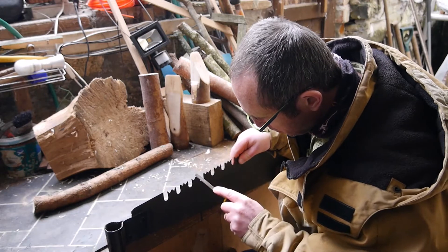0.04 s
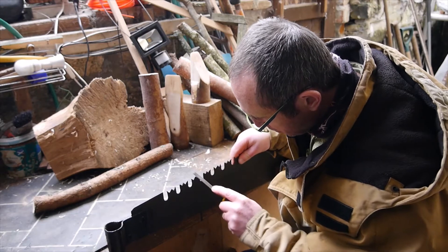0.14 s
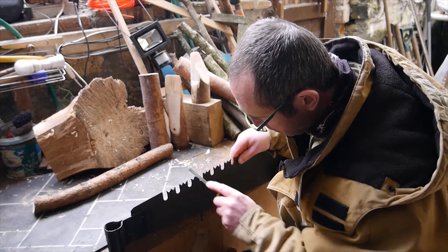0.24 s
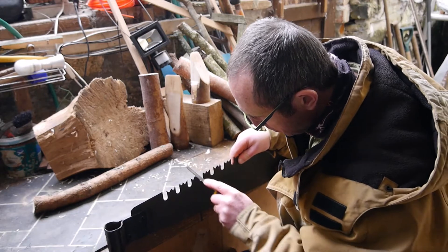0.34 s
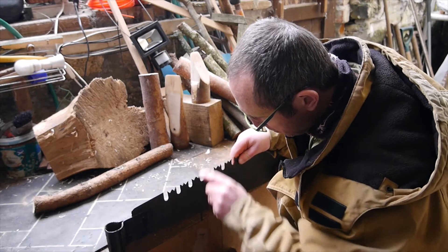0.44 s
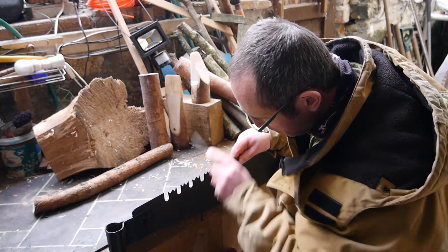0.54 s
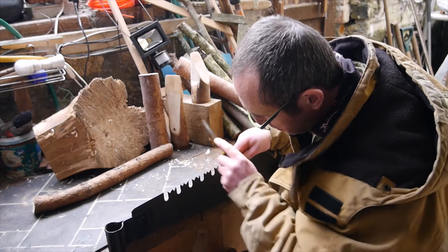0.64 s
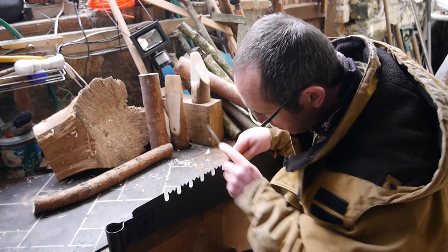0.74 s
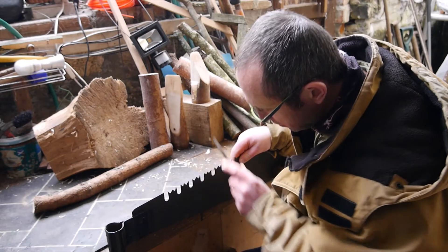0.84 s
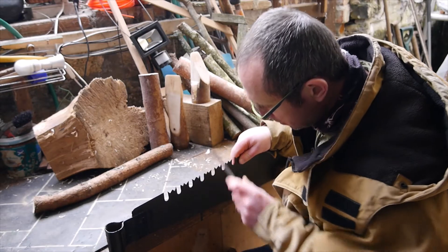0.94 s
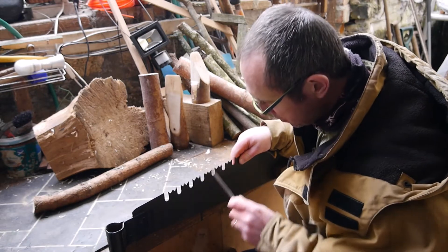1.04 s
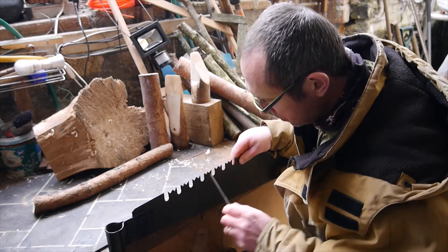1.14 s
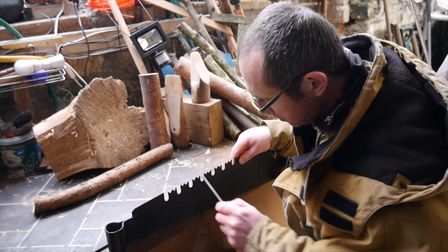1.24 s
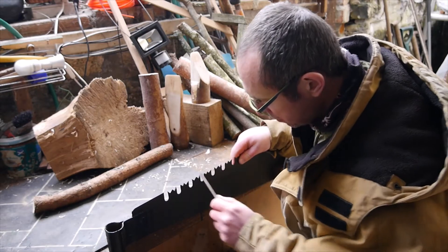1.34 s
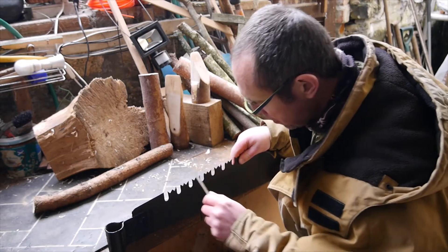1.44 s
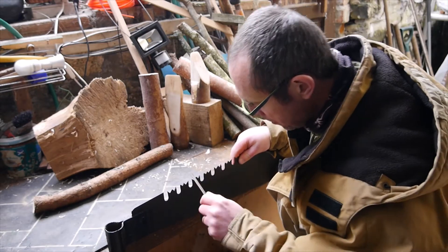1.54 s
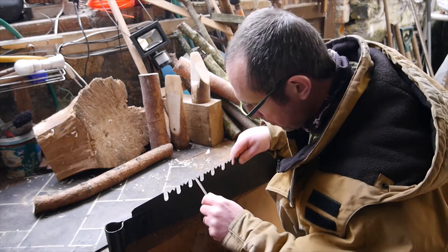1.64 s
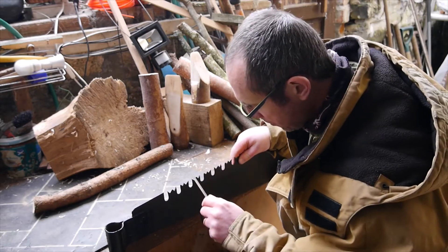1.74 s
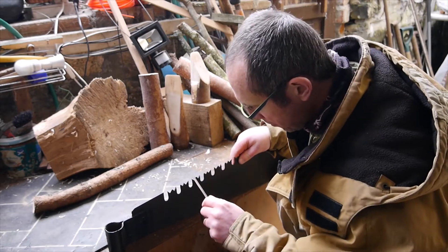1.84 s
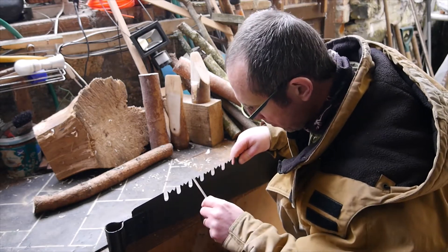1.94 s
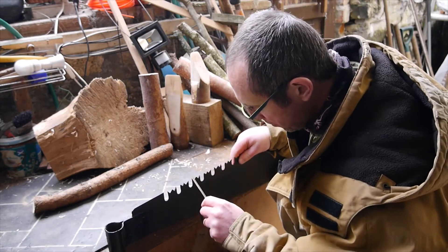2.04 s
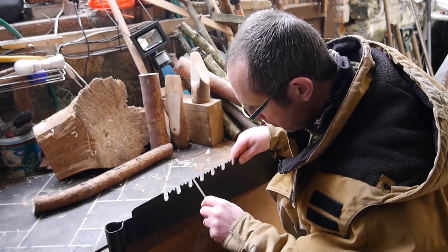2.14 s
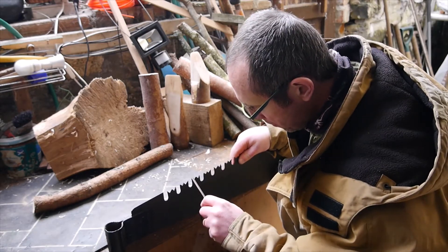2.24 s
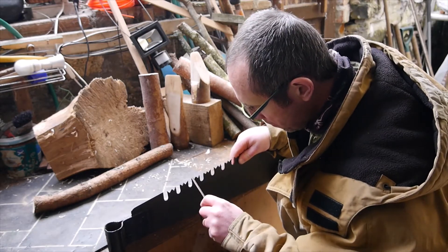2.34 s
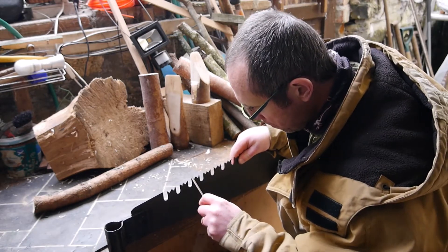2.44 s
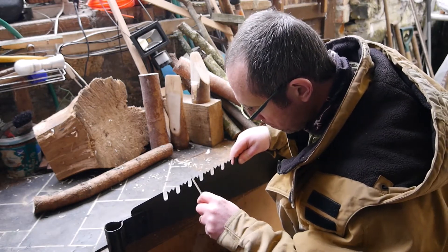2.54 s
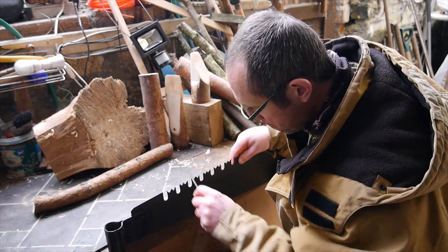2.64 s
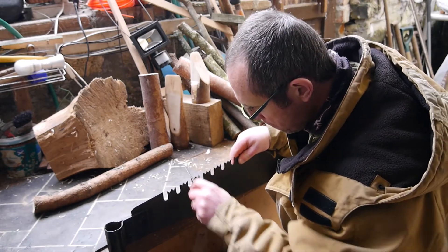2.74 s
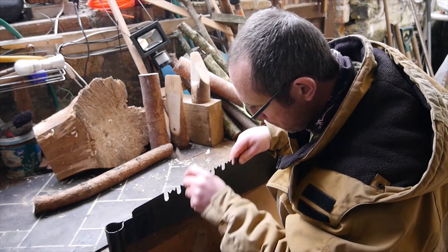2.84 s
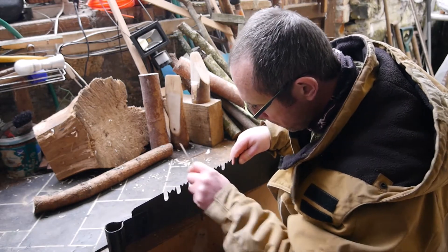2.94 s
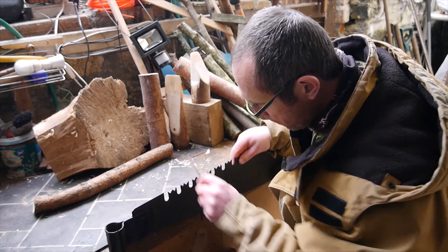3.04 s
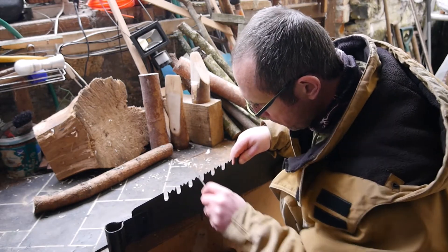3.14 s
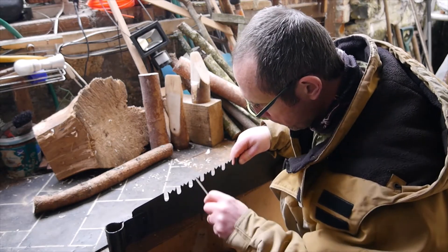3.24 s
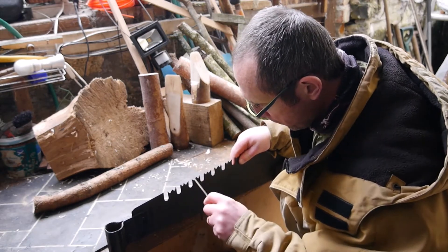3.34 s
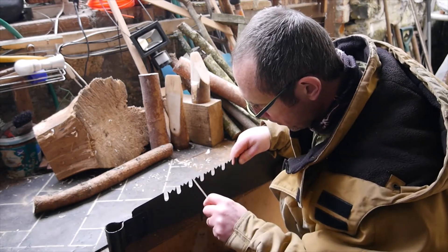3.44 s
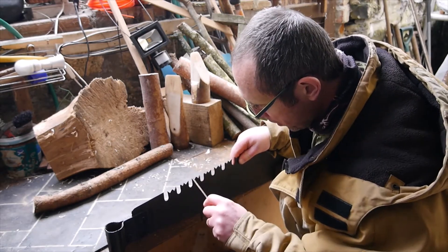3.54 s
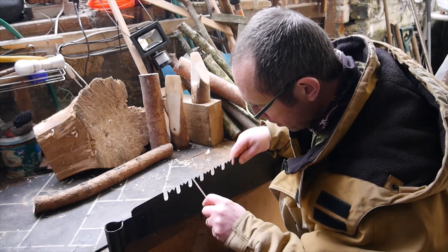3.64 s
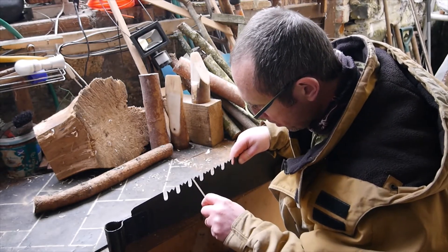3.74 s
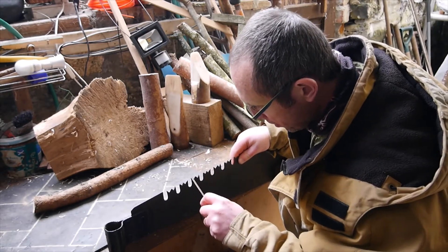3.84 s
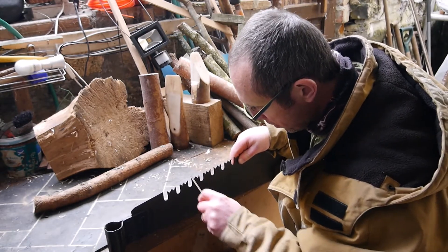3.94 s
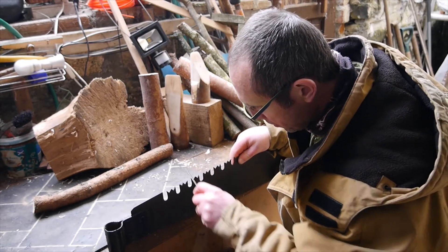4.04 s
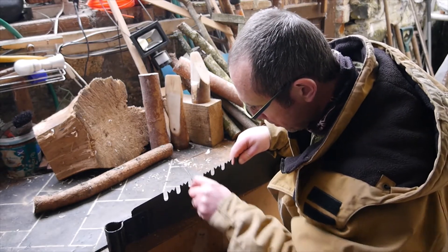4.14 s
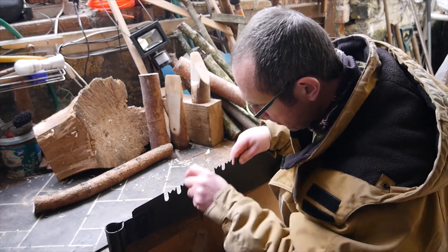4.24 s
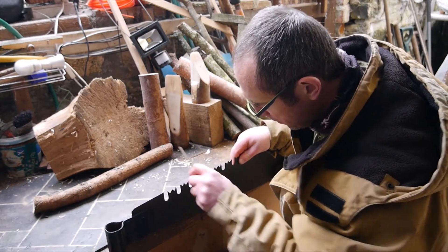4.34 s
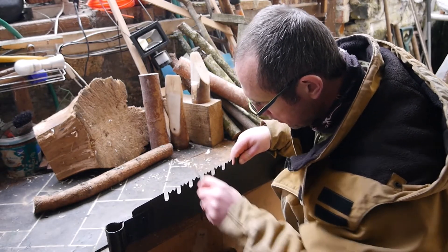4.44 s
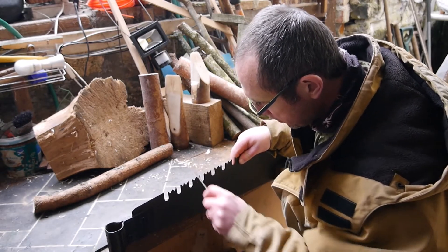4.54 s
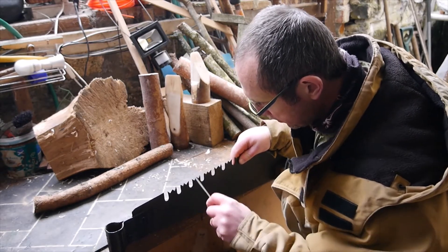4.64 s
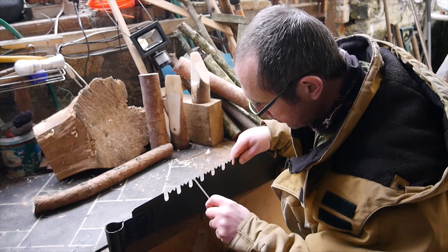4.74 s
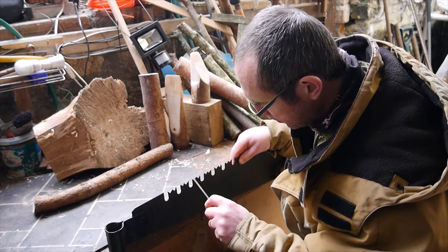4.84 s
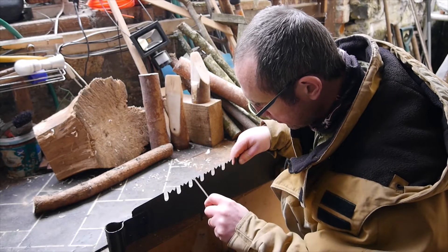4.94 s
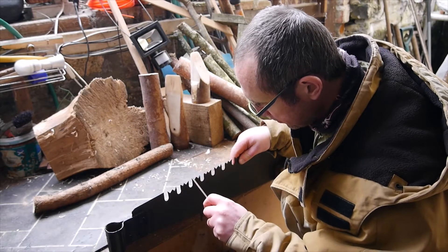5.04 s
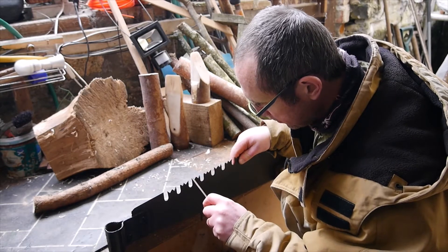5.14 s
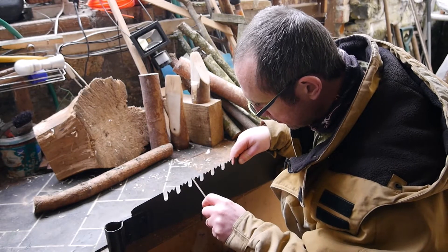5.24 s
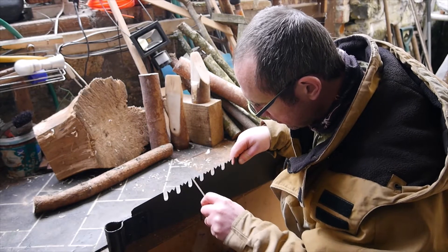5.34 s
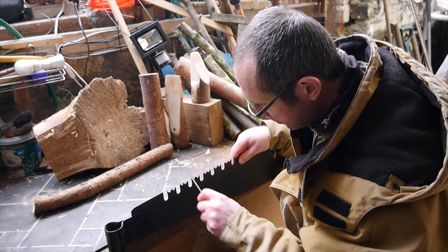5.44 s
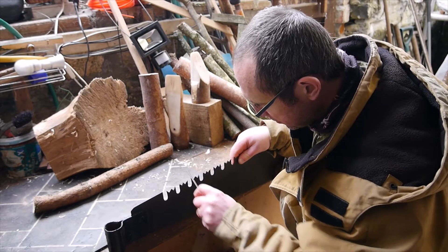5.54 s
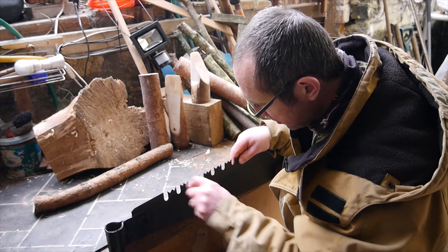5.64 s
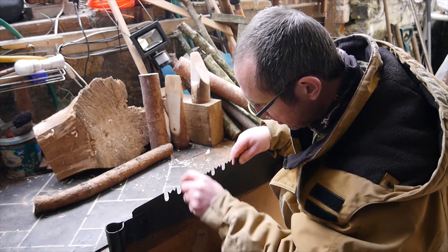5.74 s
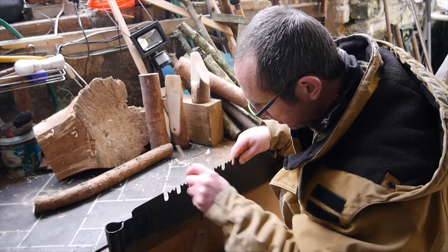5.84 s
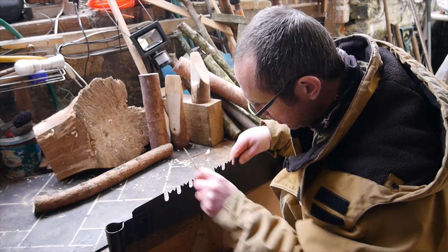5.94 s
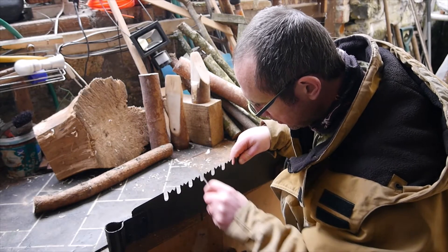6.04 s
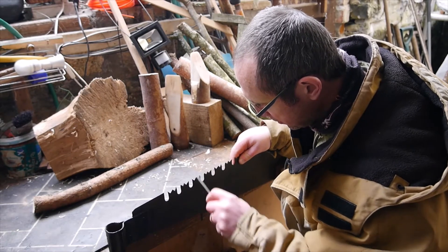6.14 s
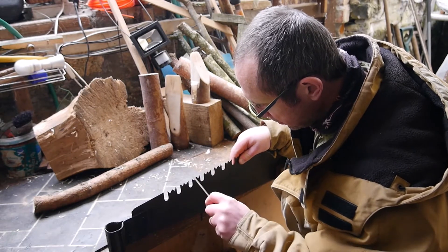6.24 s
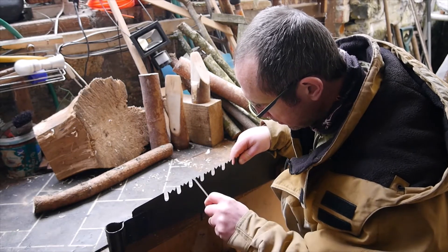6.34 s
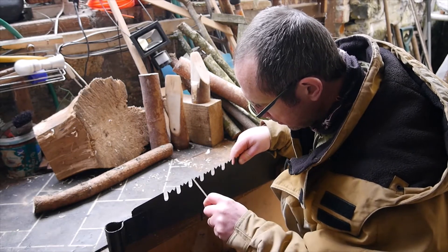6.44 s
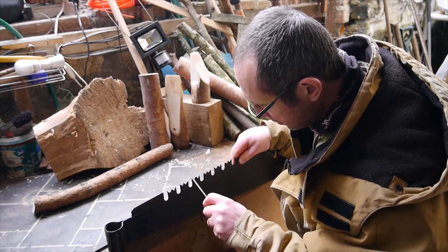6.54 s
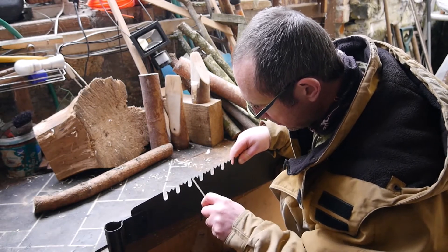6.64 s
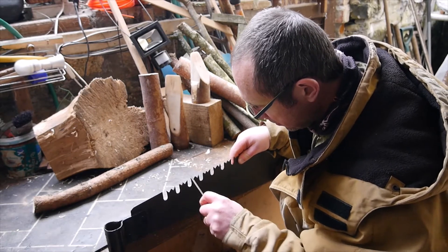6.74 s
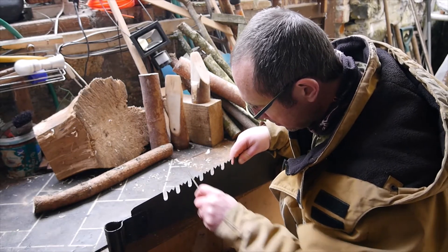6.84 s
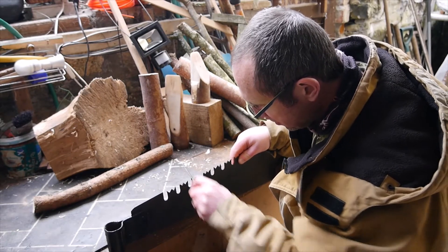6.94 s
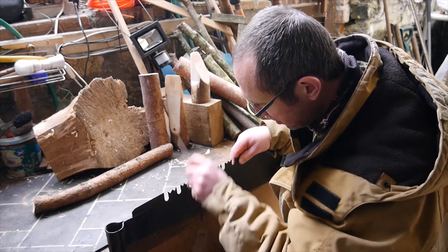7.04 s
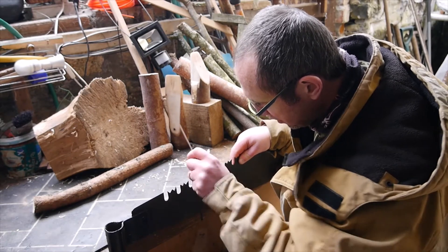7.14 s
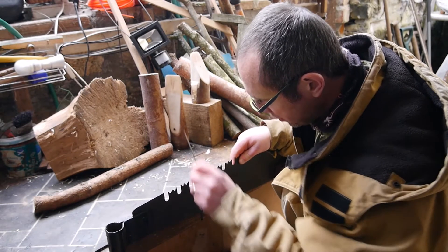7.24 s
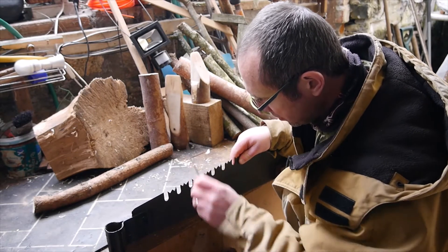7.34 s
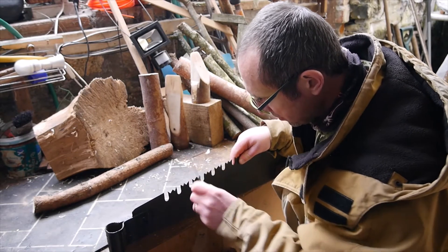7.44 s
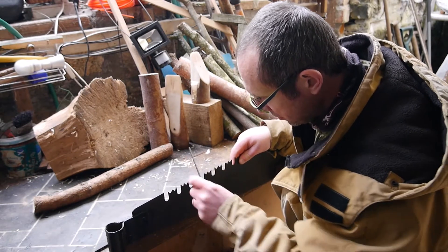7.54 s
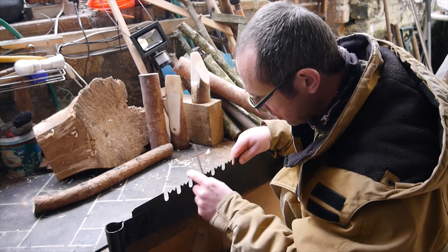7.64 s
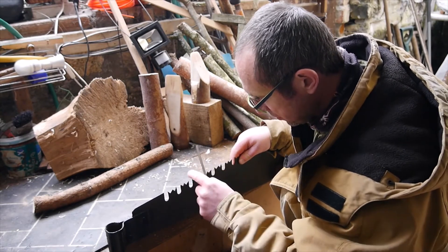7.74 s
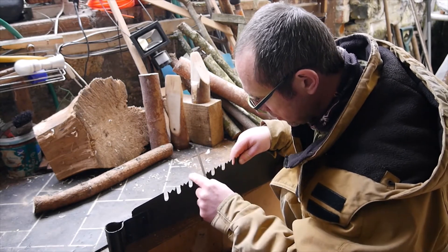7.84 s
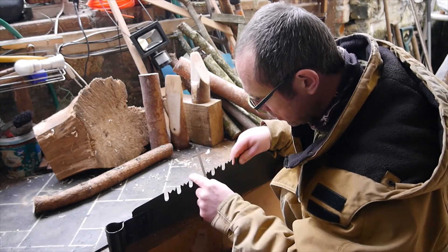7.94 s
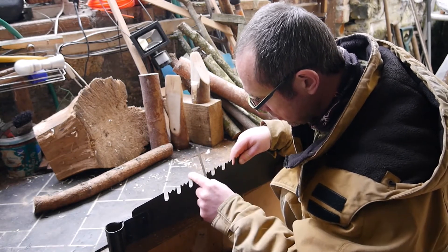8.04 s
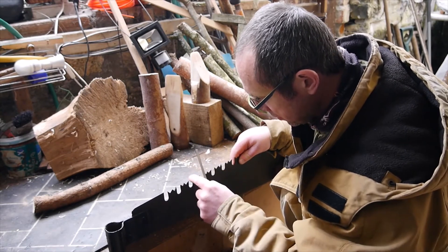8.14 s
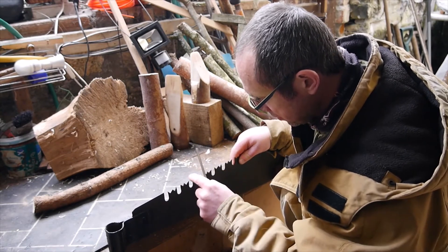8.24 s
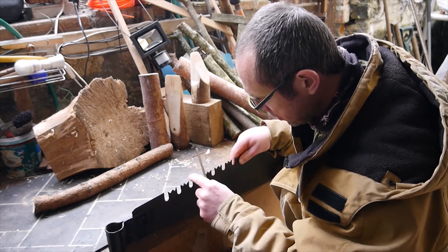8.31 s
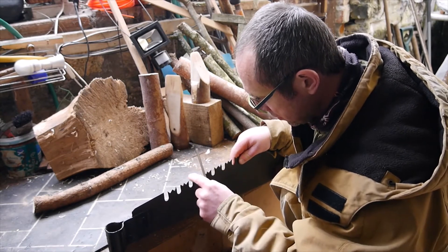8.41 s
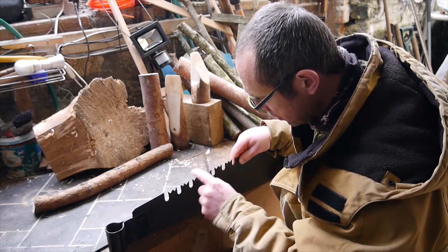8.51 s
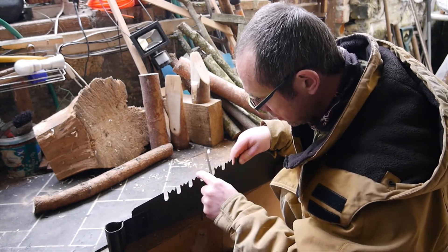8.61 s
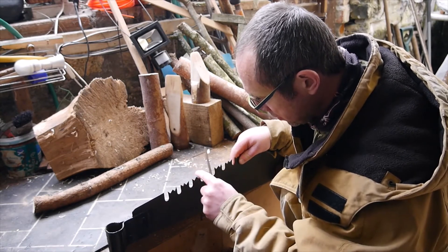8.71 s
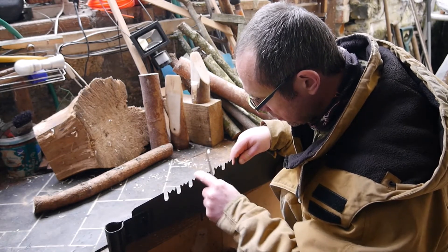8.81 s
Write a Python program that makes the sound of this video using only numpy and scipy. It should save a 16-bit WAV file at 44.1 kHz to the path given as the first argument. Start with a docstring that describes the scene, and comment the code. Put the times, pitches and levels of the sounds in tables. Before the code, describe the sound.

A small file works slowly across the teeth of a large saw blade, heard close in a workshop with short echoes and steady, quiet room noise. There are five strokes, at about 0.2 to 0.5 seconds, 2.5 to 2.8, 3.7 to 4.2, 5.4 to 5.8 and 6.7 to 7.0. Each catches on the teeth, judders the blade with a low thrum, brightens into a gritty rasp and ends in a scrape, the steel ringing briefly. The fourth has the sharpest ending. Between strokes the file taps lightly on the steel, near 1.1, 2.1, 2.3, 3.1, 3.5, 4.4, 5.1 and 6.1 seconds. A heavy sleeve brushes softly around 0.9 seconds. A small bird outside whistles faint, thin, high notes from 1.7 to 2.4 and from 6.0 to 6.7 seconds. After the last stroke only room noise remains, with one tiny tap near 8.1 seconds.

```python
"""A workshop: a small file makes five slow strokes across the teeth of a big saw blade clamped to a bench.
Each stroke grips, judders the blade, brightens as it gathers speed and ends in a scrape; between strokes
the file taps back into its gullet. Tooth clicks and taps drive the steel's modes in four bands:
thrum (slow bending), rasp (middle modes), zing and hiss (cutting edge).
A sleeve brushes past and a small bird sings faintly outside, over short echoes and steady room noise."""
import sys
import numpy as np
from scipy import signal
from scipy.fft import rfft, irfft, next_fast_len
from scipy.io import wavfile
from scipy.ndimage import uniform_filter1d

SR = 44100
rng = np.random.default_rng(int(sys.argv[2]) if len(sys.argv) > 2 else 0)


def to_wav(sig):
    """Store sig (one row per channel, or 1-D mono) as 16-bit WAV at the path in sys.argv[1].

    Samples outside -1..1 are clipped; the rate is SR.
    """
    pcm = np.clip(np.atleast_2d(sig), -1, 1) * 32767
    pcm = np.round(pcm).astype(np.int16)
    wavfile.write(sys.argv[1], SR, pcm.T)  # frames by channels


N = 391166
TIME = np.arange(N) / SR

# File pushes, long and short; levels in all tables are relative: start/s, hardest press/s, let-go/s,
# thrum/dB, rasp/dB, edge/dB, press growth/dB, speed growth/dB, last scrape/dB, deep over high bending/dB
PUSHES = [ (0.175, 0.33, 0.525, -20.5, -34, -31.5, 8.5, 9.5, 14, 4.5),
          (2.45, 2.456, 2.51, -31.5, -49, -45, -0.5, -1, 0, 7),
          (2.528, 2.756, 2.838, -15.5, -28, -22, 13.5, 19, 1.5, 1),
          (3.723, 3.752, 3.77, -30.5, -42.5, -41, 9, 4.5, -3.5, 5),
          (3.906, 3.957, 4.034, -22, -35.5, -33, 10, 4.5, -2, 0.5),
          (3.964, 4.077, 4.232, -15, -27, -24, 10.5, 6.5, 5, -4),
          (5.166, 5.33, 5.24, -43, -52.5, -57.5, 6, 4, 0, 4),
          (5.365, 5.695, 5.762, -15.5, -28, -25, 13.5, 16, 4.5, -1),
          (6.643, 6.705, 6.72, -44, -59, -53, 6, 8, 2, 2),
          (6.727, 6.772, 6.784, -23, -37, -39, 2.5, 5, -0.5, -3.5),
          (6.817, 6.907, 7.031, -13.5, -27, -21.5, 3, 8.5, 3, -5.5), ]
# Rise as the teeth grip, fall as the file lifts: thrum/(dB/s), rasp/(dB/s), edge/(dB/s)
GRIP_DB_PER_S = [750, 2200, 3500]
LIFT_DB_PER_S = [291, 405, 443]
# Teeth catch and drag: t/s, thrum/dB, rasp/dB, edge/dB, decay constant/s
BITES = [(0.073, -39, -48.5, -55, 0.041), (0.145, -31, -54, -49, 0.027), (0.302, -13, -29, -28, .018),
         (0.43, -20.5, -39, -27.5, 0.06), (2.526, -21, -32, -33, .018), (2.612, -16, -31, -37, .014),
         (2.668, -8, -30, -37, 0.013), (2.706, -25, -26, -22, 0.016), (3.719, -34, -50, -39, 0.026),
         (3.826, -29.5, -44.5, -48, 0.038), (4.063, -6.5, -26, -24, 0.02), (4.172, -3, -21, -28, 0.012),
         (5.366, -13.5, -40, -41, 0.0081), (5.45, -36, -40, -28, 0.032), (5.492, -5.5, -21.5, -35, 0.013),
         (5.57, -9.5, -39, -34, 0.0097), (5.619, -6.5, -20.5, -26, 0.017), (5.702, -7, -20, -10, 0.01),
         (5.746, -15, -20, -7, 0.014), (6.724, -14.5, -34.5, -31.5, 0.014),
         (6.836, -7.5, -15.5, -24, 0.012), (6.904, -8, -22, -18, .014)]
# Contact spot of each long stroke: from t/s, favoured f/Hz, muted f/Hz
CONTACT_SPOTS = [(0, 870, 4170), (2.2, 510, 1250), (3.4, 1650, 120), (5.0, 3400, 285), (6.5, 656, 223)]
# File set down or nudging the steel: t/s, thrum/dB, rasp/dB, edge/dB
TAPS = [(1.13, -40, -56, -58), (2.084, -42, -42, -40.5), (2.294, -38, -42.5, -48), (3.082, -37.5, -56, -57),
        (3.522, -40, -41, -29.5), (3.547, -34.5, -42, -36), (4.441, -37, -51, -50),
        (5.095, -40, -39, -32.5), (6.059, -40, -43.5, -45.5), (8.098, -45, -57, -51)]
# Broad response of blade and file: f/Hz, level/dB
STEEL_SPECTRUM = [(30, -50.3), (70, -34.4), (110, -23.9), (170, -18.1), (500, -19.6), (1000, -20.5),
                  (1150, -20.6), (1800, -23.9), (3650, -32.6), (4300, -29.7), (5200, -30.1), (9700, -23.8),
                  (12000, -39.1), (15000, -52.3)]
# Their resonances: f/Hz, width/Hz, level/dB
STEEL_MODES = [(198, 30, -7.1), (233, 35, -7.2), (286, 50, -9.6), (398, 74, -9.0), (469, 71, -6.5),
               (561, 64, -6.5), (618, 44, 0.1), (670, 30, -5.8), (719, 59, -4.9), (837, 72, -10.7),
               (946, 110, -8.6), (1648, 214, -20.0), (2306, 39, -20.2), (2641, 34, -19.3),
               (4159, 115, -22.9), (4389, 112, -24.2), (4490, 147, -29.0), (5780, 60, -19.7),
               (5992, 51, -13.5), (6168, 46, -23.4), (6912, 50, -24.6), (7195, 85, -23.3),
               (7658, 26, -19.3), (8201, 45, -19.5), (8392, 44, -19.2), (8510, 291, -22.4),
               (9139, 187, -17.9), (9337, 26, -17.1), (9729, 59, -24.6), (10284, 90, -22.0)]
# Weighting by the drawn file: f/Hz, gain/dB
CONTACT_GAIN = [(60, -2), (105, -2.5), (200, 1), (400, 1.5), (650, 1), (1000, -0.5), (1700, -2),
                (3000, 0.5), (3600, -3), (4400, 1.5), (6000, -0.5), (9200, 0), (13000, 3)]
# Blade and bench ringing on: t/s, f/Hz, level/dB, t60/s
RINGS = [(0.53, 5030, -30, 0.13), (2.83, 238.6, -30, 0.45), (4.235, 4390, -27, 0.13),
         (4.239, 4530, -24, 0.14), (5.449, 5990, -30, 0.21), (5.745, 228, -16, 0.23),
         (5.807, 717, -21, 0.15), (6.059, 93, -49, 0.37), (6.839, 116.4, -27, 0.35), (7.07, 282, -34, 0.42)]
# Sleeve friction: f/Hz, level/dB
CLOTH_SPECTRUM = [(88, -48), (150, -18), (468, -0.5), (1080, -14), (1160, -14), (1770, -15), (4480, -24.5),
                  (9580, -16), (14000, -41)]
# Bird song: t/s, length/s, first f/Hz, last f/Hz, level/dB
BIRD_NOTES = [(1.749, 0.14, 7270, 7230, -55.5), (1.891, 0.083, 5830, 5590, -55.5),
              (1.994, 0.099, 6940, 6860, -46.5), (2.223, 0.13, 4356, 4405, -46),
              (5.98, 0.089, 7320, 7200, -54), (6.103, 0.096, 5900, 5730, -59),
              (6.182, 0.15, 7020, 6910, -58), (6.43, 0.044, 4300, 4350, -47.5),
              (6.484, 0.07, 4370, 4380, -53.5), (6.6, 0.11, 7240, 7060, -58)]
# Echo decay: f/Hz, t60/s
ROOM_T60 = [(150, 0.44), (700, 0.16), (3000, 0.2), (10000, 0.17)]
# Echo width: f/Hz, side over middle/dB
ROOM_WIDTH = [(100, -7), (250, -19.5), (650, -9.5), (1300, 1), (3000, 0.5), (12000, 0.5)]
# Room noise: f/Hz, level/dB
AIR_SPECTRUM = [(15, -57), (25, -25), (37, -37), (64, -10), (101, -15), (193, -3), (445, -5.5), (537, -2),
                (631, -6), (684, -4.5), (970, -6), (1850, -10.5), (5580, -23.5), (9550, -17.5),
                (15500, -38)]
# Room noise between the ears: f/Hz, correlation
AIR_CORRELATION = [(60, 0.8), (130, 0.78), (290, 0.83), (640, 0.39), (1410, 0.0), (3100, 0.18),
                   (6820, 0.086), (15000, 0.58)]


def filing(trim_db=-1., bite_db=-4., bite_rise_s=0.0016, judder_db=2., judder_hz=136., brighten_db=8.5):
    """Four-band force on the steel: file teeth under the pressure of pushes and bites."""
    power = sum((push(*row[:-1]) * amp(trim_db)) ** 2 for row in PUSHES) + 1e-14
    t = TIME[:SR // 5]
    for start_s, *levels_db, decay_s in BITES:
        drag = (1 - np.exp(-t / bite_rise_s)) * np.exp(-t / decay_s)
        add(power, start_s, (amp(np.add(levels_db, bite_db))[:, None] * drag) ** 2)
    judder = unit_rms(amp(judder_db * wander(judder_hz)))  # stick-slip clumps the clicks
    coarse = teeth(per_s=2000.)
    chips = teeth(per_s=8000.)
    cutting = np.sqrt(0.48) * coarse + np.sqrt(0.52) * chips
    # late in a stroke the file skates fast and light: brighter rasp, more zing
    skating = power[2] / (power[0] + power[2])
    rasping = tilt(cutting, pivot_hz=2500., db=brighten_db * (0.66 - skating))
    force = np.sqrt(power) * judder * np.array([coarse, rasping, cutting])
    return split_edge(force, zing_share=0.39 + 0.2 * skating)


def push(start_s, hardest_s, end_s, thrum_db, rasp_db, edge_db, press_growth_db, speed_growth_db,
         last_scrape_db, ease_db=7.5, scrape_s=0.05):
    """Envelopes of one push: thrum follows the hand's press, rasp and edge the file's speed."""
    press_db = np.interp(TIME, [start_s, hardest_s, end_s], [-press_growth_db, 0, -ease_db])
    speed_db = -speed_growth_db * np.interp(TIME, [start_s, end_s], [1, 0]) ** 0.95
    scrape_db = last_scrape_db * np.exp(-np.maximum(end_s - TIME, 0) / scrape_s)
    levels_db = np.array([thrum_db + press_db,
                          rasp_db + speed_db + 0.65 * scrape_db,
                          edge_db + speed_db + scrape_db])
    grip_db = np.outer(GRIP_DB_PER_S, np.clip(start_s - TIME, 0, .5))
    lift_db = np.outer(LIFT_DB_PER_S, np.clip(TIME - end_s, 0, .5))
    return amp(levels_db - grip_db - lift_db)


def teeth(per_s, spread_db=1.5):
    """File teeth snap over the edge: irregular clicks of uneven size."""
    hits = rng.random(N) < per_s / SR
    size = amp(spread_db * np.clip(rng.standard_normal(N), -2, 2))
    return unit_rms(hits * size * rng.choice([-1., 1.], N))


def split_edge(force, zing_share):
    """The cutting edge's power divides between zing and hiss."""
    thrum, rasp, edge = force
    return np.array([thrum, rasp, edge * np.sqrt(zing_share), edge * np.sqrt(1 - zing_share)])


def contact_spots(force, favoured_db=3., muted_db=-4.5, spread_oct=0.15):
    """Each stroke bears on a new spot, favouring one range of modes and muting another."""
    parts = np.split(force, [round(start_s * SR) for start_s, *_ in CONTACT_SPOTS[1:]], axis=1)
    out = []
    for part, (_, *pair_hz) in zip(parts, CONTACT_SPOTS):
        size = next_fast_len(part.shape[1])
        offset_oct = np.log2((np.fft.rfftfreq(size, 1 / SR)[:, None] + 1) / pair_hz)
        gain = amp(np.exp(-(offset_oct / spread_oct) ** 2) @ [favoured_db, muted_db])
        out.append(irfft(rfft(part, size) * gain, size)[:, :part.shape[1]])
    return np.hstack(out)


def steel_responses(crossovers_hz=(1100, 3600, 7900), ripple_db=0.5, min_width_hz=43.):
    """The steel's answer to one tooth: thrum, rasp, zing and hiss impulse responses."""
    hz = np.fft.rfftfreq(8192, 1 / SR)
    power = amp(lookup(STEEL_SPECTRUM, hz)) ** 2
    for centre_hz, width_hz, db in STEEL_MODES:
        broad_hz = max(width_hz, min_width_hz)  # sharpest modes broadened: rasp without whistle
        peak = amp(db) / (1 + (2 * (hz - centre_hz) / broad_hz) ** 2)
        power += width_hz / broad_hz * peak ** 2
    gain = np.sqrt(power) * amp(lookup(CONTACT_GAIN, hz))
    weak_modes = uniform_filter1d(uniform_filter1d(rng.standard_normal(len(hz)), size=7), size=5)
    ripple = amp(-ripple_db * unit_rms(weak_modes))
    low, middle, high = (1 / (1 + (hz / corner_hz) ** 12) for corner_hz in crossovers_hz)
    upper_shares = (middle - low, high - middle, 1 - high)
    upper = [minimum_phase(gain * ripple * np.sqrt(abs(share))) for share in upper_shares]
    return [minimum_phase(gain * np.sqrt(low))] + upper


def bending(thrum, slack_db=5.5):
    """A lightly pressed blade bends in deeper modes."""
    points = []
    for start_s, hardest_s, end_s, *_, deep_db in PUSHES:
        points += [(start_s, deep_db + slack_db / 2), (hardest_s, deep_db), (end_s, deep_db + slack_db)]
    return tilt(thrum, pivot_hz=483., db=np.interp(TIME, *np.transpose(points)))


def taps(gain_db=(24., 23., 24.), skid_s=0.015, skid_ratio=5.5, zing_share=0.7, crisp_db=3.5):
    """Four-band force of the file touching down: sharp contact, short skid."""
    force, t = np.zeros((3, N)), TIME[:SR // 12]
    for start_s, *levels_db in TAPS:
        blow = rng.standard_normal(len(t)) * np.exp(-t / skid_s)
        blow *= skid_ratio / np.linalg.norm(blow)
        blow[0] += 1  # contact impulse
        add(force, start_s, amp(np.add(levels_db, gain_db))[:, None] * blow / np.linalg.norm(blow))
    force[2] = tilt(force[2], pivot_hz=10500., db=-crisp_db) * amp(crisp_db / 2)  # steel on steel
    return split_edge(force, zing_share)


def rings(rise_s=0.0058):
    """Single modes of blade and bench die away after a jolt or let-go."""
    out, t = np.zeros(N), TIME[:SR // 2]
    for start_s, hz, db, t60_s in RINGS:
        envelope = amp(db - 60 * t / t60_s) * (1 - np.exp(-t / rise_s))
        add(out, start_s, envelope * np.sin(2 * np.pi * hz * t))
    return out


def sleeve(peak_s=0.9, spread_s=0.18, level_db=-44, flutter_db=2.):
    """Heavy cloth brushes over itself once as the arm draws back."""
    swell = amp(level_db + flutter_db * wander(25.)) * np.exp(-((TIME - peak_s) / spread_s) ** 2)
    return swell * unit_rms(colour(rng.standard_normal(N), CLOTH_SPECTRUM))


def bird(waver=0.005, tremble_db=2.5):
    """Thin whistled notes, each a slight, trembling glide."""
    out, wobble = np.zeros(N), 1 + waver * wander(80.)
    for start_s, length_s, first_hz, last_hz, db in BIRD_NOTES:
        size = int(length_s * SR)
        hz = np.linspace(first_hz, last_hz, size) * wobble[int(start_s * SR):][:size]
        note = np.sin(2 * np.pi * np.cumsum(hz) / SR) * signal.windows.tukey(size, .6)
        add(out, start_s, amp(db) * unit_rms(note))
    return out * amp(tremble_db * wander(40.))


def room_echoes(x, shift_hz=2.3):
    """Two echo patterns crossfade as arm and file move over the blade."""
    phase = 2 * np.pi * shift_hz * TIME
    return sum(signal.oaconvolve((x * share)[None], reflections(), axes=1)[:, :N]
               for share in (np.cos(phase), np.sin(phase)))


def reflections(gap_s=0.0016):
    """Short dense echoes of a cluttered room, wider in the treble."""
    hz, t, spectra = signal.stft(rng.standard_normal((2, SR // 2)), SR, nperseg=256)
    decay = amp(-60 * t / lookup(ROOM_T60, hz)[:, None])
    tails = signal.istft(spectra * decay, SR, nperseg=256)[1]
    tails *= np.clip(TIME[:tails.shape[1]] / gap_s - 1, 0, 1)
    middle, side = tails / np.linalg.norm(tails, axis=1, keepdims=True)
    side = colour(side, ROOM_WIDTH)
    return np.array([middle + side, middle - side])


def room_air(level_db=-46., flicker_db=0.64):
    """Steady workshop noise, most alike in both ears in the bass."""
    left, other = rng.standard_normal((2, N))
    correlation = lookup(AIR_CORRELATION, np.fft.rfftfreq(N, 1 / SR))
    right = irfft(correlation * rfft(left) + np.sqrt(1 - correlation ** 2) * rfft(other), N)
    noise = unit_rms(colour(np.array([left, right]), AIR_SPECTRUM))
    return amp(level_db - flicker_db * wander(34.)) * noise


def amp(db):
    """dB to gain."""
    return 10 ** (np.asarray(db) / 20)


def unit_rms(x):
    """Scale to rms 1."""
    return x / np.sqrt(np.mean(x ** 2) + 1e-20)


def lookup(table, hz):
    """Interpolate on a log-frequency axis."""
    table_hz, values = np.transpose(table)
    return np.interp(np.log(hz + 1), np.log(table_hz + 1), values)


def add(mix, start_s, sound):
    """Mix in place from start_s."""
    part = mix[..., max(round(start_s * SR), 0):][..., :sound.shape[-1]]
    part += sound[..., :part.shape[-1]]


def colour(x, spectrum):
    """Filter by a table of f/Hz, gain/dB."""
    size = x.shape[-1]
    return irfft(rfft(x) * amp(lookup(spectrum, np.fft.rfftfreq(size, 1 / SR))), size)


def tilt(x, pivot_hz, db):
    """Raise lows against highs by db, a number or a curve."""
    low = irfft(rfft(x) / (1 + (np.fft.rfftfreq(N, 1 / SR) / pivot_hz) ** 8), N)
    return low * amp(db / 2) + (x - low) * amp(-db / 2)


def wander(rate_hz):
    """Smooth random curve up to rate_hz, rms 1."""
    hz = np.fft.rfftfreq(N, 1 / SR)
    return unit_rms(irfft(rfft(rng.standard_normal(N)) / (1 + (hz / rate_hz) ** 4), N))


def minimum_phase(gain):
    """Promptest impulse response of this spectral shape, energy 1."""
    log_gain = np.log(np.maximum(gain / gain.max(), 1e-5))
    mirrored = np.r_[log_gain, log_gain[-2:0:-1]]
    spectrum = np.exp(np.conj(signal.hilbert(mirrored)))[:len(gain)]
    response = irfft(spectrum)[:len(gain)]
    return response / np.linalg.norm(response)


def scene(low_room_db=-9.5, bright_room_db=-6., bright_direct_db=-0.5, left_lean_db=1.75):
    """Steel, bird and sleeve, direct and echoed, over the room noise."""
    forces = contact_spots(filing()) + taps()
    thrum, rasp, zing, hiss = (signal.oaconvolve(force, response)[:N]
                               for force, response in zip(forces, steel_responses()))
    low = bending(thrum) + rings()
    bright = rasp + zing + hiss + bird() + sleeve()
    pan = amp([[left_lean_db], [-left_lean_db]])
    direct = low + amp(bright_direct_db) * pan * bright
    return direct + room_echoes(amp(low_room_db) * low + amp(bright_room_db) * bright) + room_air()


def record(dry, ceiling=.8, cutoff_hz=15700):
    """Round off the highest peaks, then low-pass."""
    rounded = dry / (1 + (dry / ceiling) ** 4) ** .25
    lowpass = signal.firwin(511, cutoff_hz, window=("kaiser", 9), fs=SR)
    return signal.oaconvolve(rounded, lowpass[None], "same")


dry = scene()
out = record(dry)
to_wav(out)
```